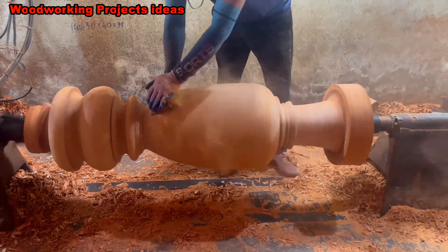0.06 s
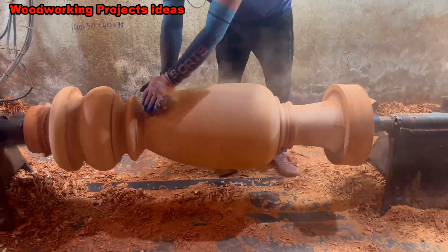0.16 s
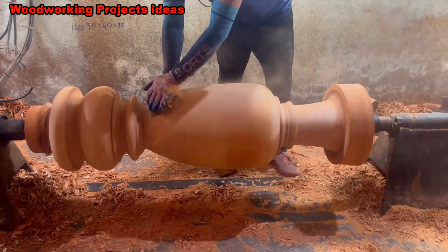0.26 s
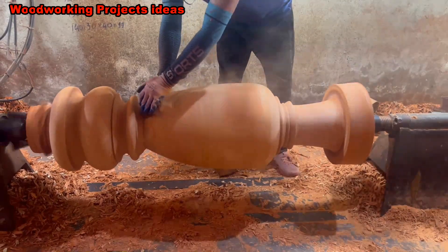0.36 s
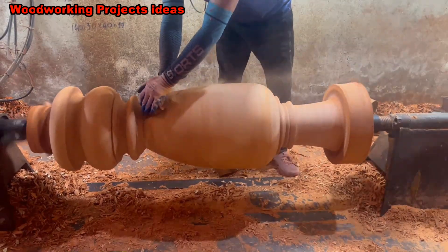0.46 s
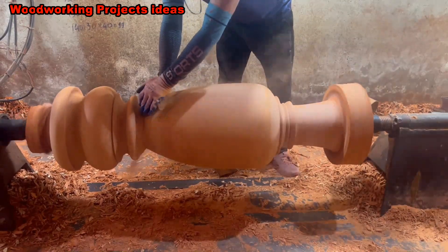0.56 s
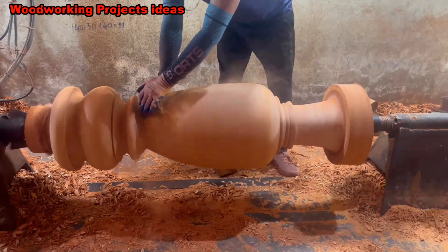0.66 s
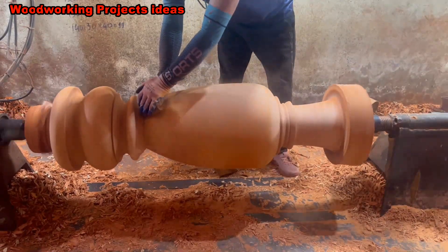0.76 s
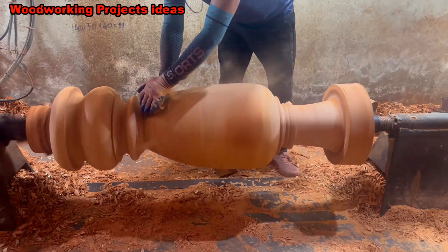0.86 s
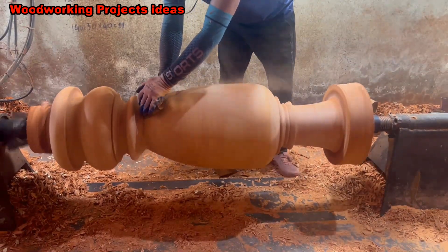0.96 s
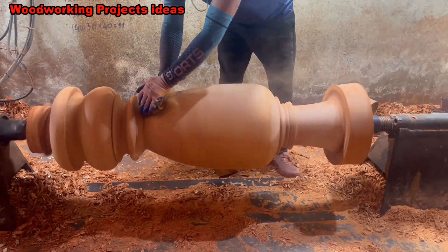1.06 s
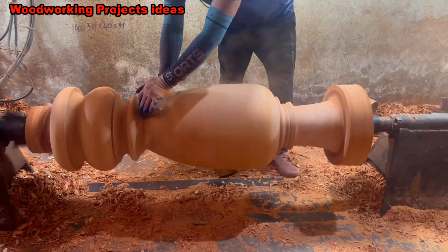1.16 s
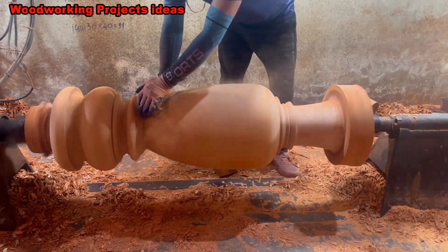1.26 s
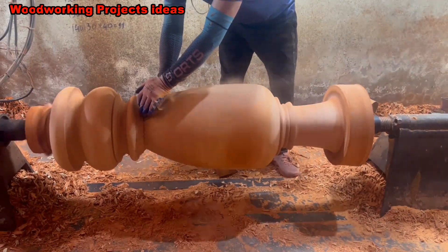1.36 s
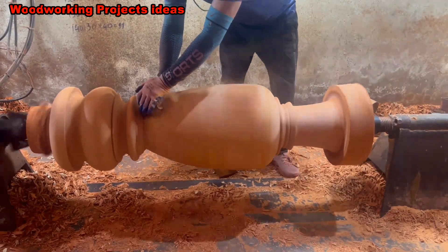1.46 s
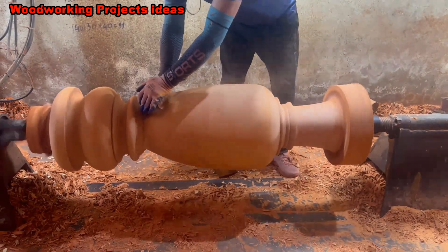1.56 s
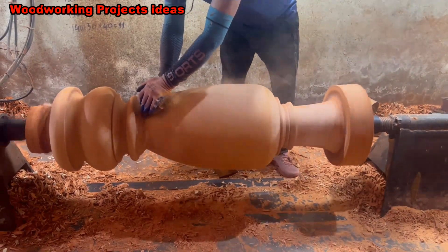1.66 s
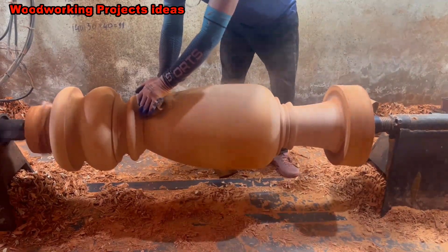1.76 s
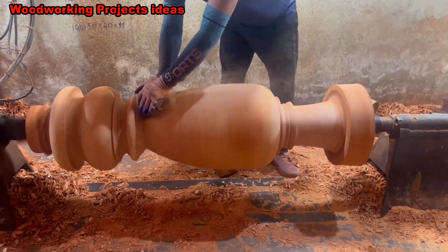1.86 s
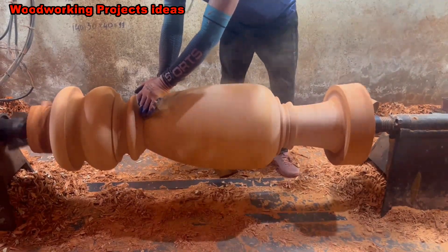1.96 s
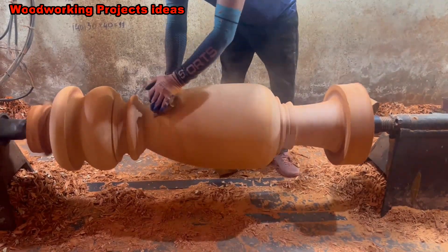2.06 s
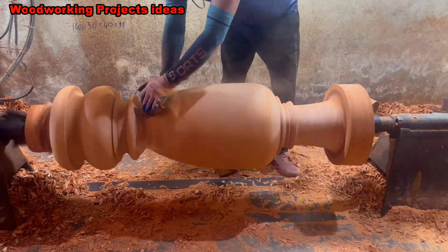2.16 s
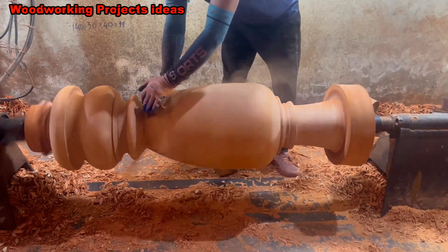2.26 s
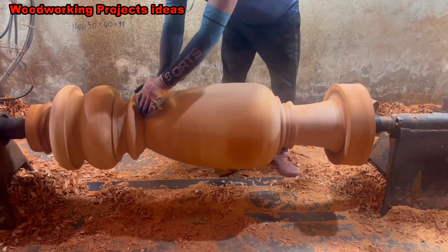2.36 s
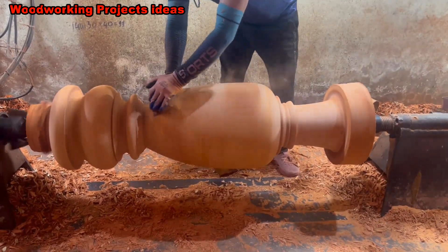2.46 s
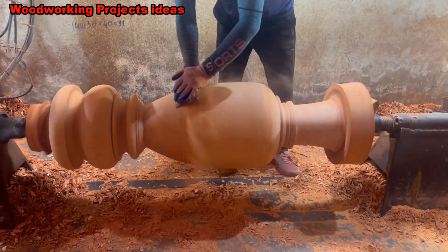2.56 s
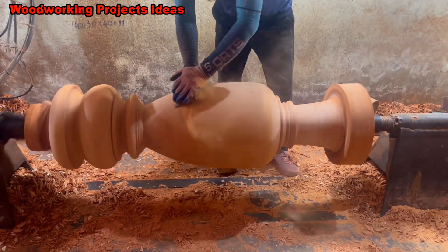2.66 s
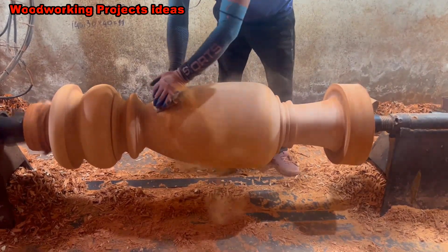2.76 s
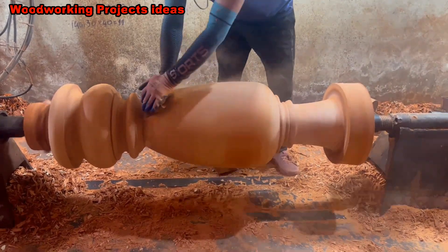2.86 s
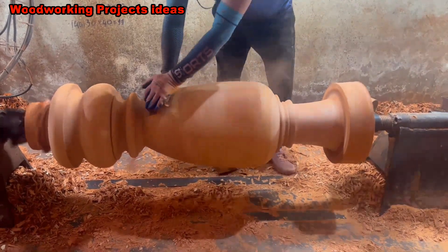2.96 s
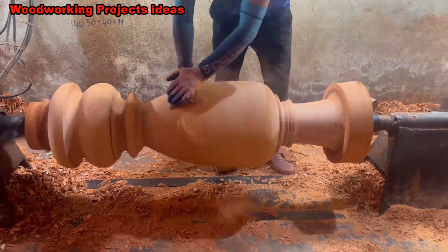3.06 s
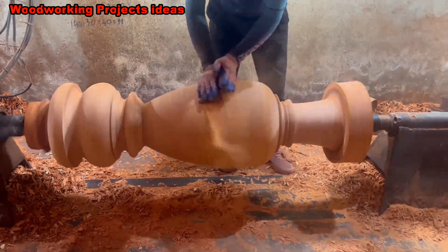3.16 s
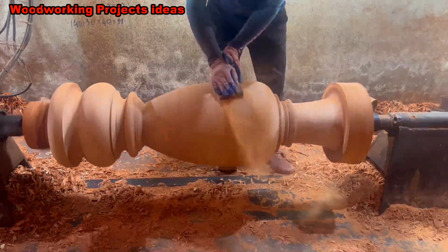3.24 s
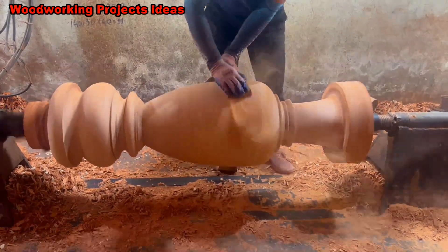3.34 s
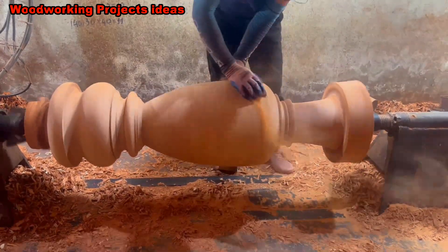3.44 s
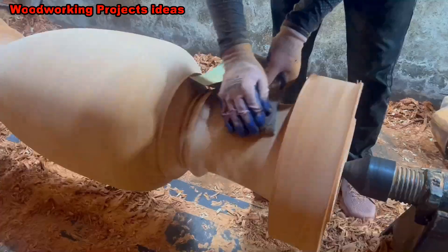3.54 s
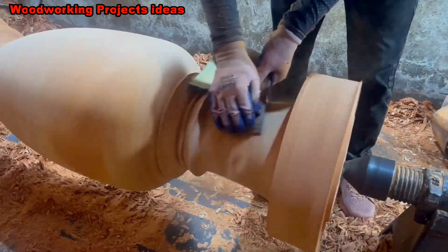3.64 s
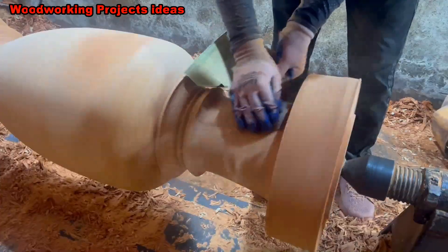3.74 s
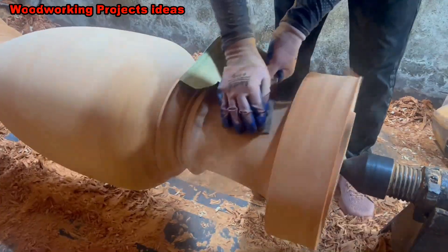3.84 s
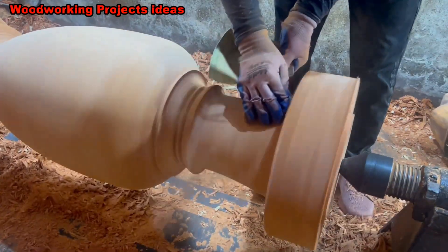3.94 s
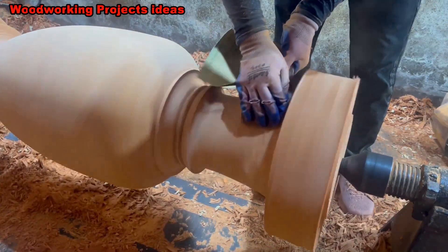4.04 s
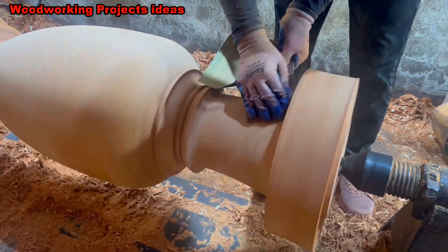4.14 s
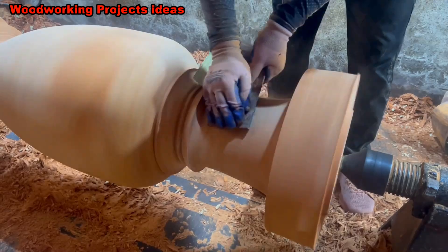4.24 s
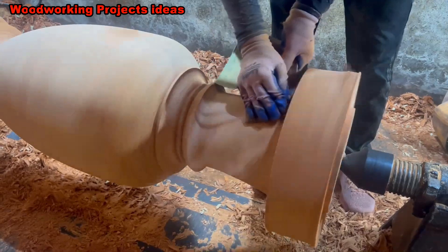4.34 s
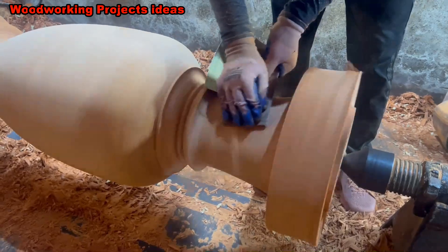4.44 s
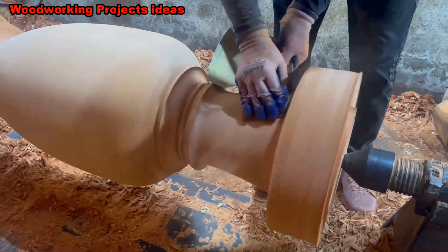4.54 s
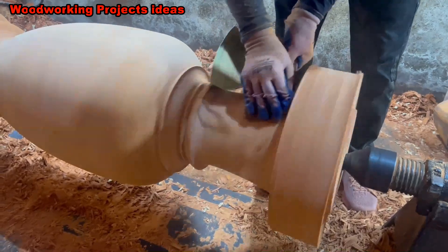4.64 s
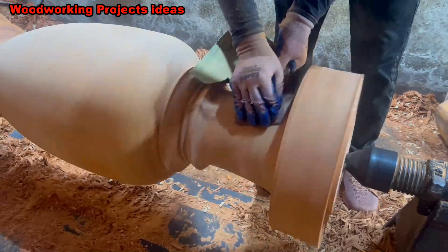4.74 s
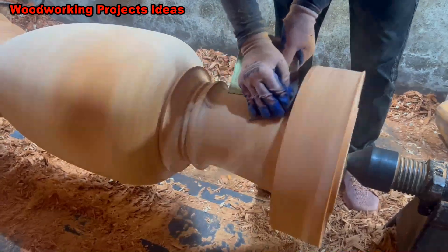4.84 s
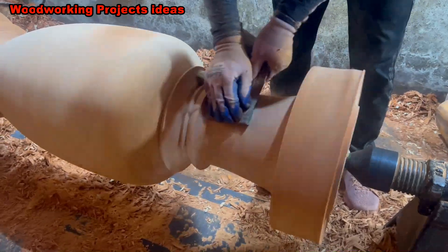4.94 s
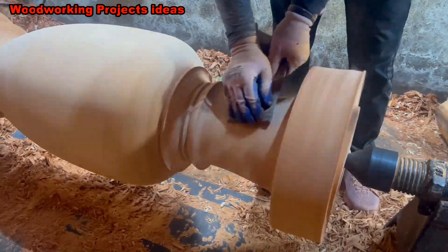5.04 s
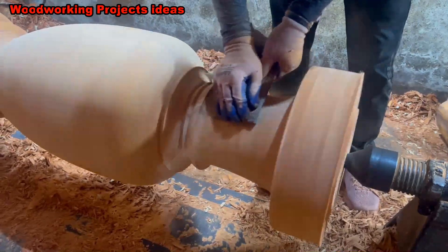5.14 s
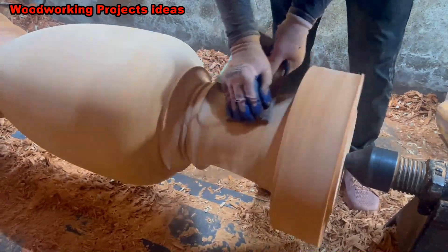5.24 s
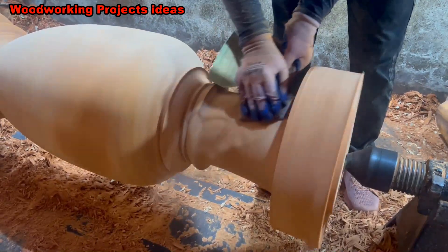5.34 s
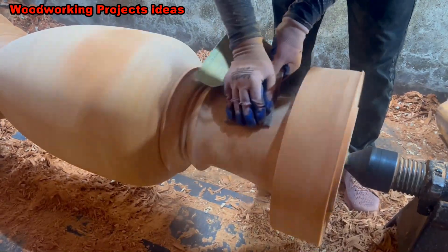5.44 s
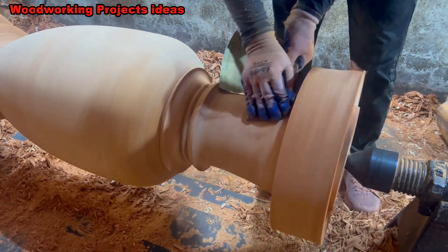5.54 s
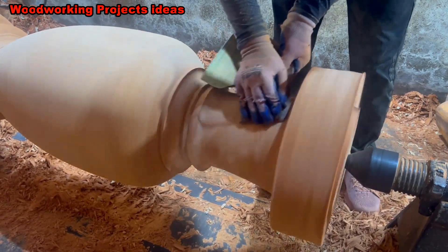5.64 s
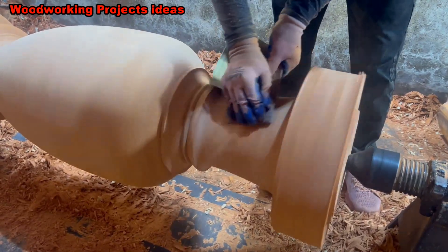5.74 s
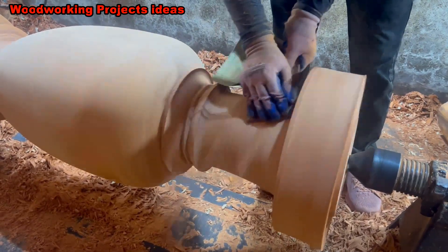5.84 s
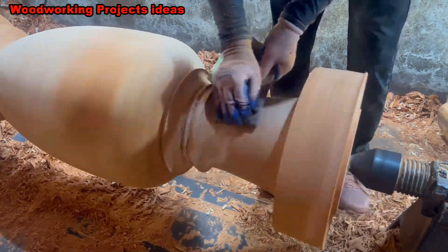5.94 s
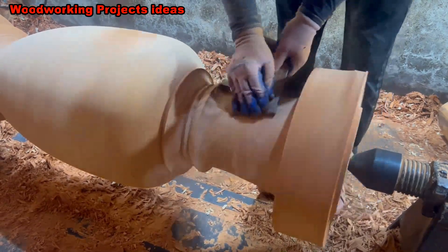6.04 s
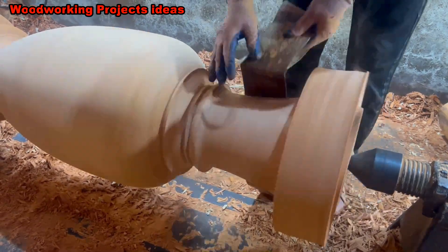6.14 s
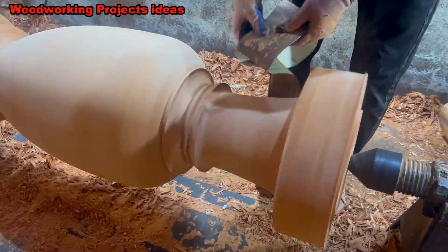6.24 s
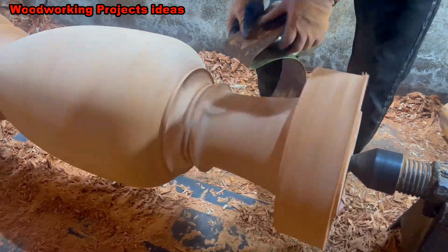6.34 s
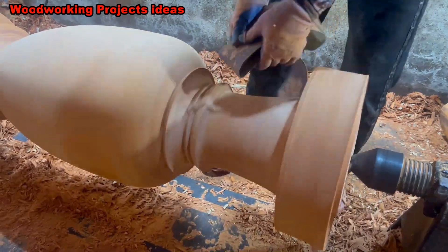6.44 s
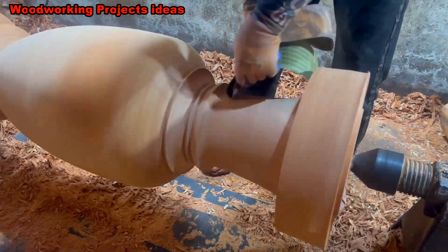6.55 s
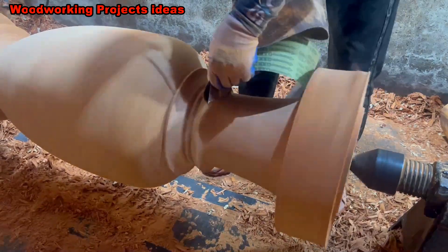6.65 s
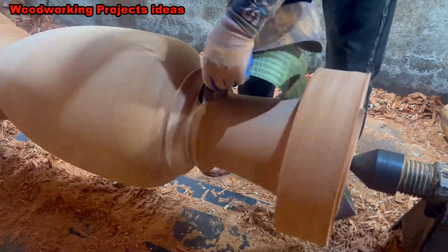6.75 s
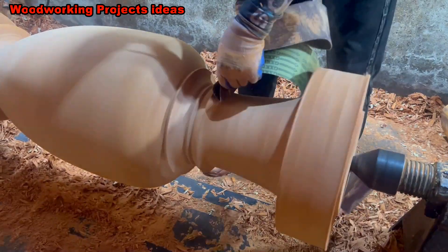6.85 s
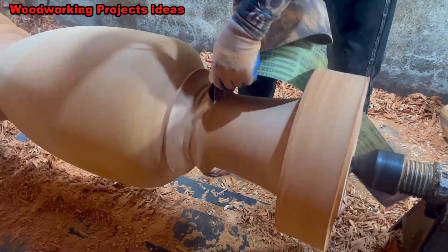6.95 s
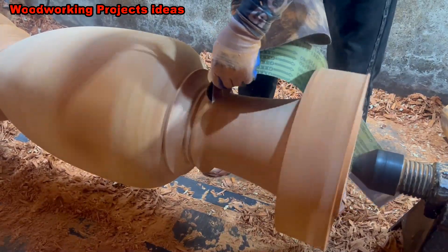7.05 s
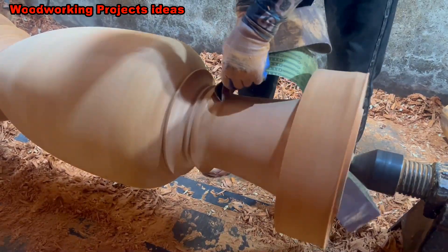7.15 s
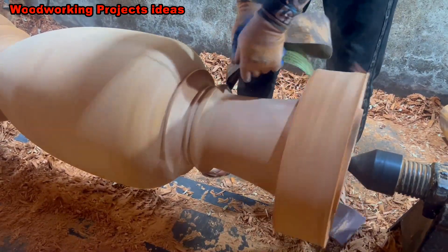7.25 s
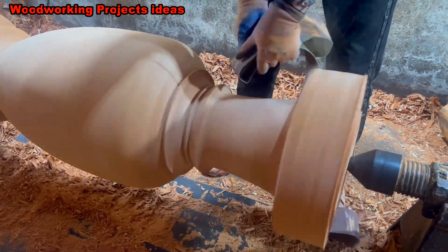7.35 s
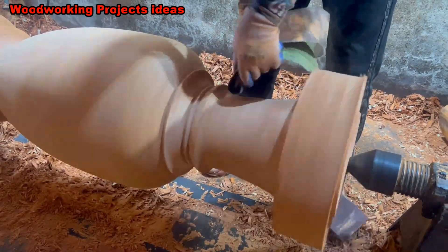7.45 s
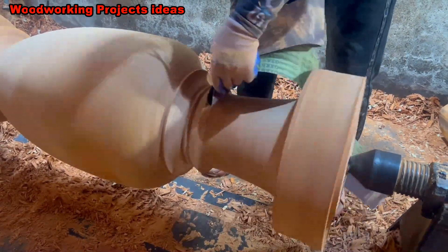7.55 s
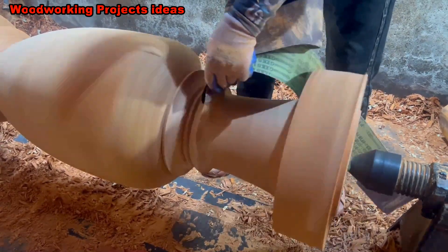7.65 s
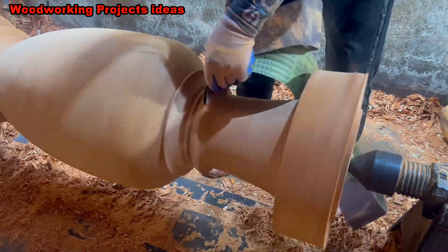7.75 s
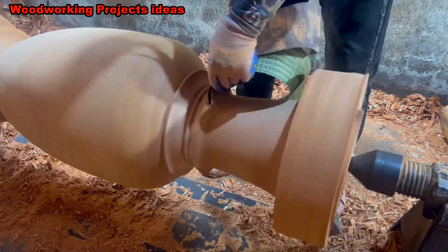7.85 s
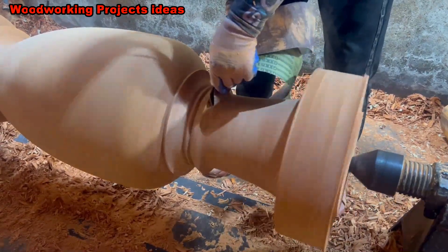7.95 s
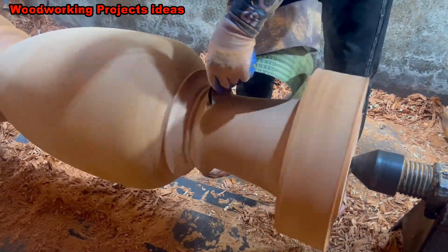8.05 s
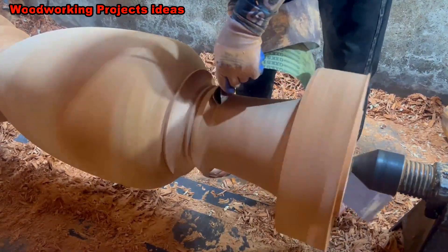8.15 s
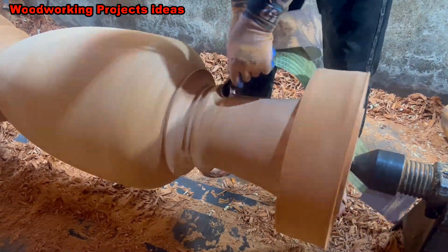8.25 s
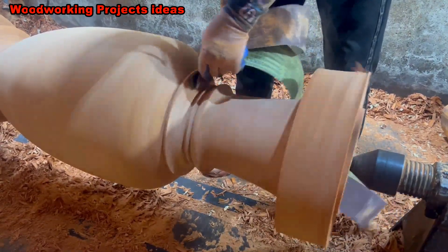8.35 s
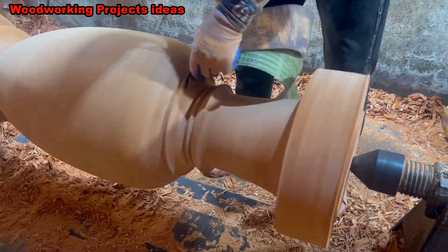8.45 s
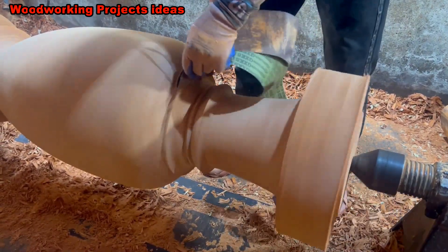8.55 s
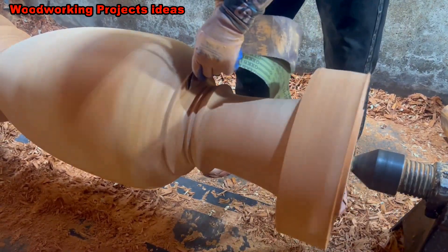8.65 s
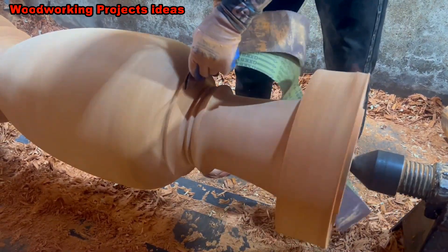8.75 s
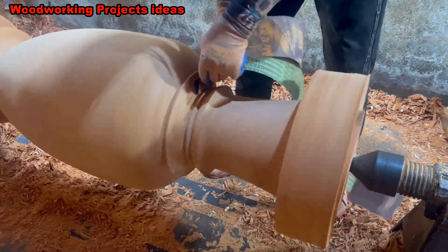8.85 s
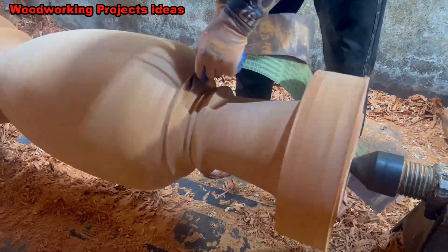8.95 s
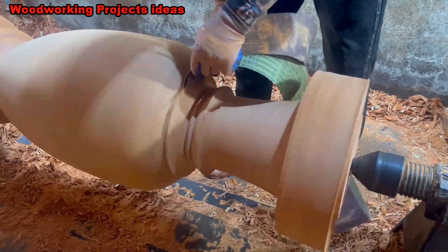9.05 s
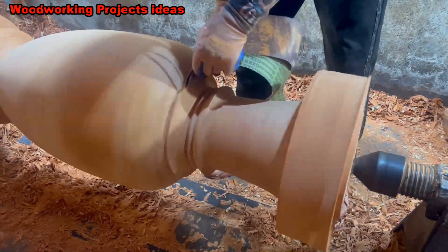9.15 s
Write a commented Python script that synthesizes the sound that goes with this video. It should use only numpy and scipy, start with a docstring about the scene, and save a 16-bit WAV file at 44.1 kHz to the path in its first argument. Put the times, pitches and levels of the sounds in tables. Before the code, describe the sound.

A wood lathe rumbles evenly in a workshop while sandpaper hisses and scrapes on the turning wood, throbbing slightly. After about four seconds the microphone is suddenly close: the rasp grows fuller and gusts of air thump softly against it. The paper lifts for half a second, leaving the machine's hollow whirr, then comes back in a few short, bright passes with small gaps between them.

```python
"""A workshop, where sandpaper is held against a big wooden column spinning on a lathe.
From a few steps away the microphone hears the belly sanded and swept; then, from close by, the neck,
a groove with the folded edge of the sheet, some dabs and the shoulder. Grit tears the fibres in a
rasping hiss that throbs with each turn, and the sheet scrapes and whistles. Under it the lathe rumbles;
close in, the draught of the wood buffets the microphone."""
import sys
import numpy as np
from scipy import signal
from scipy.fft import rfft, irfft, next_fast_len
from scipy.io import wavfile
from scipy.ndimage import map_coordinates

SR = 44100
rng = np.random.default_rng(int(sys.argv[2]) if len(sys.argv) > 2 else 0)


def dump(signal):
    """Clip the signal to [-1, 1] and save it as 16-bit WAV at the path in sys.argv[1]."""
    limited = np.clip(np.atleast_2d(signal).T, -1, 1)
    pcm = np.round(limited * 32767).astype(np.int16)
    wavfile.write(sys.argv[1], SR, pcm)


N = 405719
TIME = np.arange(N) / SR
TURN_HZ = 18.1
NEAR_START_S = 3.886   # the microphone is close to the wood from here on

# holds of the paper on belly, sweep, neck, groove, dabs and shoulder: (pressed home [s], lifted [s],
# rasp [dB], hiss [dB], sizzle [dB], extra first push [dB], spread of snaps [dB], lean to the left [dB])
HOLDS = [(0, 2.795, -33.5, -35, -38, 2.6, 1.3, 0.1), (2.805, 3.866, -33.5, -31.5, -39, -0.6, 1.5, 0),
         (3.901, 6.436, -30.5, -33, -37.5, 4, 1.4, 0), (6.944, 7.577, -36, -34, -34.5, 0.4, 2.0, -0.4),
         (7.866, 8.604, -36.5, -32, -34, -1, 2.5, 0), (8.732, 9.2, -33, -30, -35.5, -2, 3, 0.7)]
# colour of the friction in each hold: (frequency [Hz], relative level [dB])
BELLY_COLOUR = [(590, -46), (1000, -17), (1390, -16), (1690, -12), (2620, -8.5), (3180, -6), (4150, -2),
                (4490, -3.5), (6560, -1), (8540, 0.5), (11800, -22), (14100, -35), (15500, -45)]
SWEEP_COLOUR = [(650, -56), (1100, -34), (1370, -31), (1550, -13.5), (2020, -6), (2230, -9), (2730, -3.5),
                (2980, -4.5), (3520, 0), (4110, 1), (6050, -5.5), (8720, -5), (10300, -7), (12100, -23),
                (15500, -30)]
NECK_COLOUR = [(590, -30), (1000, -9.5), (1240, -5.5), (1920, 0.5), (2740, -2), (3610, 1.8), (4050, 0),
               (4340, -0.5), (5460, -1.5), (5920, -2), (6950, -5.5), (8840, -1), (9690, -3.5), (11000, -10),
               (11750, -18.5), (12500, -40), (15500, -36)]
GROOVE_COLOUR = [(710, -41), (1200, -9), (1420, -12), (1570, -8), (2510, -13.5), (2740, -9), (3350, -6.5),
                 (3850, -5), (4930, -4.5), (6800, -3.5), (7650, -2), (8510, -3.5), (9890, 1), (14500, -24),
                 (15500, -24)]
DABS_COLOUR = [(760, -33), (1300, -10), (1430, -18), (1620, -7), (1930, -6.5), (2350, -9.5), (2950, -8),
               (3590, -4.5), (4370, -6), (5330, -6), (6030, -5), (7420, -4.5), (8490, -6), (9820, 2),
               (15500, -24.5)]
SHOULDER_COLOUR = [(710, -23), (1200, -11.5), (1590, -13), (1820, -11), (2050, -12.5), (3140, -7),
                   (4670, -7), (7330, -4), (9080, -5.5), (9890, -2), (11900, -7), (14900, -32),
                   (15500, -43)]
# resonances of the sheet and the hollow under the hand: (pitch [Hz], width [Hz], level re friction [dB])
BELLY_MODES = [(3560, 130, -7), (4205, 70, -5), (8400, 500, -6)]
SWEEP_MODES = [(3750, 240, -18), (4490, 460, -3.5)]
NECK_MODES = [(1990, 170, -4), (2520, 380, -5), (3650, 560, -5.5), (4440, 520, -1), (5900, 200, -7)]
GROOVE_MODES = [(3880, 370, 0.5), (7740, 410, 1.5), (9800, 600, -14)]
DABS_MODES = [(5350, 470, 1.5), (7600, 630, 2), (9500, 440, -13)]
SHOULDER_MODES = [(5150, 400, -10), (7340, 450, -1)]
# the hand eases without lifting: (time [s], length at half depth [s], rasp loss [dB], hiss loss [dB])
EASES = [(0.02, 0.37, 2.5, 11.5), (1.55, 0.32, 3, -1), (2.98, 0.17, -0.7, 4.5), (3.65, 0.39, -2.5, 7),
         (3.665, 0.11, 5, 1.5), (3.85, 0.11, -0.5, -2), (6.4, 0.12, 2.5, 2.5), (6.968, 0.058, 3, 3.5),
         (7.9, 0.048, 3.5, 3), (8.032, 0.062, 0.5, 7.5), (8.155, 0.074, -0.5, 9.5), (8.375, 0.044, 3, 10),
         (8.78, 0.04, 0, 3), (9.175, 0.034, 2.5, 5)]
# echoes off the wood and the arm: (delay [ms], level re direct sound [dB])
REFLECTIONS = [(1.3, -28), (3.1, -16), (7.0, -12.5)]
# the running lathe from a few steps away and from close by: (frequency [Hz], relative level [dB])
LATHE_FAR_COLOUR = [(18, -42), (30, -13), (65, -9.5), (108, -2.5), (147, -1), (236, -1.5), (355, -1.5),
                    (412, -4.5), (439, -5), (501, -6), (662, -5.5), (779, -2.5), (1030, -8.5), (1400, -3.5),
                    (1500, -8), (1950, -29), (3300, -120)]
LATHE_NEAR_COLOUR = [(120, -38), (200, -10), (486, -9.5), (585, -6), (752, -3.5), (1090, -11), (1180, -17),
                     (1450, -13.5), (1550, -12.5), (1630, -19), (1710, -13), (2830, -21), (9460, -38.5),
                     (11000, -43.5), (14300, -83), (22000, -120)]
# resonances and hollows of the lathe: (frequency [Hz], width [Hz], lift [dB])
MOTOR_MODES = [(139, 17, 1.5), (534, 93, -0.5), (905, 150, 3.5)]
BED_MODES = [(300, 53, 2.5), (430, 79, -5.5), (597, 58, 3), (770, 41, 1.5), (2060, 300, 4),
             (8900, 2800, 10)]
# left-right balance by pitch in the far and near parts; the top treble is duller on the left:
# (frequency [Hz], left minus right before limiting [dB])
BALANCE_FAR = [(60, -12), (92, 2), (140, -3.5), (210, -2.5), (330, -2), (500, -6.5), (770, 0.5),
               (1060, 3.5), (1300, 0.5), (1790, -1), (2740, -2), (4190, 0.5), (6410, 5.5), (9810, -1.5),
               (15000, -10)]
BALANCE_NEAR = [(60, -3), (99, -4), (160, -23), (270, -3.5), (450, -4), (740, 1.5), (1220, 1.5),
                (2010, 2.0), (3330, 0.5), (5500, 1.5), (9080, -0.5), (15000, -8.5)]
# bites of the paper: (time [s], length at half height [s], pitch [Hz], nominal width [Hz], level [dB])
SCRAPES = [(0.1, 0.17, 3700, 800, -39), (0.42, .3, 4900, 1200, -37.5), (0.65, .06, 4600, 1500, -37),
           (2.245, 0.037, 4150, 450, -35), (2.45, 0.12, 4250, 1300, -33), (2.86, 0.07, 4200, 1500, -31.5),
           (2.96, 0.12, 3720, 700, -34), (2.98, 0.1, 4500, 500, -34.5), (3.46, 0.12, 3900, 1100, -32.5),
           (3.55, 0.04, 4000, 1100, -32.5), (3.99, 0.12, 3800, 2600, -32), (4.14, 0.06, 4000, 2200, -29.5),
           (4.151, 0.05, 2260, 700, -30.5), (4.489, 0.049, 4000, 1500, -30), (5.2, 0.044, 2162, 700, -32.5),
           (5.56, 0.07, 3660, 900, -31), (6.07, 0.22, 1960, 480, -34.5), (6.085, 0.05, 2600, 1800, -33),
           (7.02, 0.03, 7350, 700, -35), (7.03, 0.04, 5000, 2000, -36), (7.16, 0.04, 4000, 900, -34),
           (7.866, 0.008, 9000, 4000, -32), (7.955, 0.05, 9600, 900, -33), (7.98, .06, 7500, 900, -39),
           (8.11, 0.1, 5400, 350, -42), (8.25, .08, 7100, 1600, -36), (8.52, 0.14, 4700, 2000, -37),
           (8.655, 0.025, 6500, 5000, -42), (8.84, 0.06, 7300, 1000, -36), (8.93, 0.067, 4900, 1200, -38),
           (9.1, 0.06, 4900, 1200, -38)]
# passing notches: (time [s], length at half depth [s], frequency [Hz], half width [Hz], loss [dB])
NOTCHES = [(0.05, 0.14, 1120, 140, 12), (0.31, 0.08, 520, 80, 24), (0.5, 0.07, 480, 80, 24),
           (0.82, 0.26, 540, 75, 13), (1.28, 0.06, 490, 70, 17), (1.75, 0.08, 505, 70, 19),
           (2.04, 0.12, 560, 100, 26), (2.46, 0.11, 555, 85, 26), (2.77, 0.07, 505, 75, 20),
           (3.02, 0.07, 505, 75, 24), (3.25, 0.13, 490, 70, 20), (4.68, 0.14, 2750, 400, 4),
           (5.3, 0.08, 2600, 270, 11), (6.37, 0.1, 2000, 350, 3), (7.88, 0.05, 3300, 270, 11),
           (7.97, 0.06, 3900, 270, 6), (8.29, 0.1, 2780, 160, 22), (8.85, 0.04, 2750, 150, 12),
           (9.03, 0.06, 4480, 140, 15)]
# quick whistles of the sheet on the belly: (time [s], relative peak [dB])
WHISTLES = [(1.508, -31.5), (1.791, -27.5), (1.845, -30.5), (1.898, -28.5), (1.943, -30), (1.99, -30),
            (2.062, -28), (2.113, -28.5), (2.172, -28), (2.237, -30), (2.335, -32), (2.556, -29.5),
            (2.607, -27.5), (2.7, -31.5), (2.775, -30.5)]
# drone of the lathe close by: (time [s], level [dB])
DRONE_LEVEL = [(3.9, -42), (4.5, -44), (4.9, -45.5), (6.0, -48.5), (6.6, -47.5), (8.1, -47), (8.75, -44.5),
               (9.2, -46)]
# strength of the draught on the microphone: (time [s], relative level [dB])
DRAUGHT_LEVEL = [(3.9, -43), (4.9, -46), (5.35, -47.5), (5.7, -55), (6.8, -58.5), (7.0, -48), (7.6, -59.5),
                 (8.2, -53), (8.55, -47.5), (9.2, -45.5)]
# colour of the draught's buffeting and deep rumble: (frequency [Hz], relative level [dB])
BUFFET_COLOUR = [(50, -31), (100, -8), (145, 2), (220, 0.5), (340, 1), (450, -3.5), (800, -37)]
RUMBLE_COLOUR = [(15, -20), (30, 2), (60, 3), (90, 10), (130, 1.5), (220, -48)]
# gusts: (time [s], length at half height [s], buffeting rise [dB], rumble rise [dB])
GUSTS = [(4.02, 0.1, 5.5, 20), (4.85, 0.03, 7, 5), (5.105, 0.025, 12, 13.5), (5.2, 0.083, 2.5, 9),
         (5.41, 0.04, 12.5, 2), (5.83, 0.037, 6, 5), (6.09, 0.042, 11, 9), (6.42, 0.05, 17, 14),
         (6.54, 0.14, 8, 18), (7.33, 0.033, 11.5, 4), (7.775, 0.04, 16, 24), (8.0, 0.026, 13, 12),
         (8.49, 0.044, 9, 10)]
# single eddies on the microphone: (time [s], relative level [dB], pitch [Hz])
THUMPS = [(3.961, -16, 340), (3.972, -21, 132), (3.988, -23, 160), (4.014, -20.5, 153), (4.039, -21, 197),
          (4.068, -24, 132), (4.164, -27, 318), (5.089, -38, 339), (5.409, -39, 245), (6.42, -26.5, 336),
          (6.522, -36, 207), (7.779, -34, 253), (7.998, -29, 455)]
# moments when the low end suddenly drops away: (start [s], end [s], bass cutoff [Hz])
BASS_DROPS = [(5.714, 5.768, 260), (5.9, 5.981, 135), (6.17, 6.212, 230), (6.25, 6.33, 125),
              (7.22, 7.252, 110), (7.45, 7.56, 220), (8.076, 8.13, 250), (8.17, 8.354, 120)]
# throbs in the hollow whirr of the lathe: (time [s], pitch [Hz], relative peak [dB])
WHIRR_THROBS = [(6.5, 770, -38), (6.703, 613, -37), (6.868, 760, -34.5), (6.884, 780, -37),
                (7.335, 565, -35), (7.612, 753, -35.5), (7.64, 820, -38), (7.769, 753, -37),
                (7.805, 770, -35.5), (8.274, 597, -38), (8.385, 780, -36), (8.414, 796, -37),
                (8.531, 802, -36), (8.561, 764, -34), (8.591, 737, -37), (8.665, 780, -37),
                (8.696, 759, -33.5), (8.732, 748, -33.5)]


def from_db(db):
    """Decibels to gain."""
    return 10 ** (np.asarray(db) / 20)


def bins_of(t):
    """The FFT frequencies of a stretch of sound, in Hz."""
    return np.maximum(np.fft.rfftfreq(2 * next_fast_len(len(t) // 2 + 1), 1 / SR), 1)


def at_hz(points, bins):
    """Join rows of (frequency [Hz], value) on a log-frequency axis."""
    hz, value = np.transpose(points)
    return np.interp(np.log(bins), np.log(hz), value)


def filtered(sound, gain):
    """Apply a gain per frequency."""
    size = 2 * (len(gain) - 1)
    return irfft(rfft(sound, size) * gain, size)[..., :sound.shape[-1]]


def between(t, start, end):
    """One from start to end, with 10 ms equal-power ramps."""
    return np.sqrt(np.clip(.5 + np.minimum(t - start, end - t) / .01, 0, 1))


def humps(t, rows):
    """Smooth rises and falls from rows of (time [s], length at half height [s], height)."""
    return sum(height * np.cos(np.pi / 2 * np.clip((t - s) / length, -1, 1)) ** 2
               for s, length, height in rows)


def plateau(t, start, end, edge_s=0.058):
    """One from start to end, sloping to zero outside."""
    return np.clip(1 + np.minimum(t - start, end - t) / edge_s, 0, 1)


def drift(t, rate_hz):
    """Smooth random wavering with a spread of about one."""
    step, run_in = 40, 4000
    pole = np.exp(-2 * np.pi * rate_hz * step / SR)
    white = rng.standard_normal(len(t) // step + run_in + 2)
    slow = signal.lfilter([1], [1, -2 * pole, pole * pole], white)
    return np.interp(np.arange(len(t)) / step + run_in, np.arange(len(slow)), slow / slow.std())


def resonance(bins, hz, width):
    """Gain of one resonance, one at its peak."""
    return 1 / np.sqrt(1 + (2 * (bins - hz) / width) ** 2)


def band_rms(gain, bins, band):
    """Rms within a band of the mean of two unrelated white noises with this gain."""
    return np.sqrt(np.mean(gain ** 2 * (bins > band[0]) * (bins < band[1])) / 2)


def noise(colour, band_hz, modes=()):
    """Diffuse stereo noise with a colour and resonances; its mono mix has rms one within the band."""
    bins = bins_of(TIME)
    lift_db = sum(db * resonance(bins, hz, width) ** 2 for hz, width, db in modes)
    gain = from_db(at_hz(colour, bins) + lift_db)
    return filtered(rng.standard_normal((2, N)), gain / band_rms(gain, bins, band_hz))


def grit(t, spread_db):
    """Grains tear wood fibres at random: many tiny snaps, a few big ones, different on each side."""
    size = from_db(spread_db * np.minimum(rng.exponential(1, len(t)), 6))
    snaps = size * rng.standard_normal((2, len(t)))
    return snaps / snaps.std()


def sheet_ring(t, snaps, gain, slide):
    """A resonance of the sheet comes and goes, sliding by a share of its pitch as the fingers shift."""
    read_at = np.arange(len(t)) + np.cumsum(slide * drift(t, 7))
    ring = [map_coordinates(side, [read_at], order=3, mode="mirror") for side in filtered(snaps, gain)]
    return np.array(ring) * from_db(1.6 * drift(t, 16))


def reflected(sound, t, wander=0.0402):
    """Short echoes comb the hiss; their paths change as the hand moves."""
    out = sound.copy()
    for delay_ms, db in REFLECTIONS:
        for side in range(2):
            delay_s = delay_ms / 1000 * (1 + wander * drift(t, 1.585))
            out[side] += from_db(db) * np.interp(t - delay_s, t, sound[side])
    return out / np.sqrt(1 + sum(from_db(db) ** 2 for _, db in REFLECTIONS))


def throb(t, turn_db, half_turn_db):
    """The slightly oval wood presses once and twice a turn; in dB."""
    angle = 2 * np.pi * TURN_HZ * t + 0.66 * drift(t, 0.91)
    return turn_db * np.sin(angle) + half_turn_db * np.sin(2 * angle)


def pressure(t, pressed, lifted, push_db, attack_db_per_s=1198, release_db_per_s=433, settle_s=0.83):
    """The hand presses home, settles and lets go; the wood throbs under it and the sheet chatters."""
    contact_db = -attack_db_per_s * np.maximum(pressed - t, 0)
    contact_db -= release_db_per_s * np.maximum(t - lifted, 0)
    settling_db = push_db * np.exp(-np.maximum(t - pressed, 0) / settle_s)
    chatter_db = 0.9 * drift(t, 75)
    return from_db(contact_db + settling_db + chatter_db + throb(t, turn_db=-0.18, half_turn_db=0.12))


def touch(t, rasp_db, hiss_db, sizzle_db, bounce_hz=8.15):
    """The three band levels, in dB, as the hand eases and rides on the wood: a light touch is duller."""
    bounce_db = 0.5 * np.cos(2 * np.pi * bounce_hz * (t - 0.84))
    rasp_loss_db = humps(t, [(s, length, db) for s, length, db, _ in EASES])
    hiss_loss_db = humps(t, [(s, length, db) for s, length, _, db in EASES]) - bounce_db
    return rasp_db - rasp_loss_db, hiss_db - hiss_loss_db, sizzle_db - 0.46 * hiss_loss_db


def sanding(hold, colour, modes):
    """One hold: snaps of grit sound through the resonant sheet as rasp, hiss and fine sizzle."""
    pressed, lifted, rasp_db, hiss_db, sizzle_db, push_db, spread_db, lean_db = hold
    during = (TIME > pressed - .05) & (TIME < lifted + .12)
    t = TIME[during]
    bins = bins_of(t)
    snaps, power = grit(t, spread_db), 1
    for hz, width, db in modes:
        mode_gain = from_db(db) * resonance(bins, hz, width)
        snaps = snaps + sheet_ring(t, grit(t, spread_db), mode_gain, slide=0.14 * width / hz)
        power = power + mode_gain ** 2
    gain = from_db(at_hz(colour, bins))
    below_hiss = 1 / (1 + (bins / 5500) ** 10)
    below_sizzle = 1 / (1 + (bins / 9200) ** 20)
    shares = [below_hiss, below_sizzle - below_hiss, 1 - below_sizzle]
    bands_hz = [(1500, 5500), (5500, 9200), (9200, 11500)]   # rasp, hiss, sizzle
    friction = 0
    for share, band, db in zip(shares, bands_hz, touch(t, rasp_db, hiss_db, sizzle_db)):
        part = filtered(snaps, gain * share) / band_rms(gain * np.sqrt(power), bins, band)
        friction = friction + part * from_db(db + 0.45 * drift(t, 19))   # each wavers on its own
    sides = from_db([[lean_db / 2], [-lean_db / 2]])
    out = np.zeros((2, N))
    out[:, during] = reflected(friction, t) * pressure(t, pressed, lifted, push_db) * sides
    return out


def lathe_far(level_db=-47):
    """From a few steps away the lathe is a dull, even rumble with a few motor resonances."""
    rumble = noise(LATHE_FAR_COLOUR, (60, 1000), MOTOR_MODES)
    return rumble * from_db(level_db + 0.5 * drift(TIME, 15))


def balanced(sound, balance):
    """Each pitch leans a little to one side; the top treble is duller on the left."""
    lean_db = np.clip(at_hz(balance, bins_of(TIME)), -8, 7)
    sides = from_db([lean_db / 2, -lean_db / 2])
    sides = sides / np.sqrt(np.mean(sides ** 2, axis=0))
    return np.array([filtered(channel, gain) for channel, gain in zip(sound, sides)])


def scrapes():
    """The paper bites for a moment and one resonance sings out, pulsing as the wood turns."""
    out = np.zeros((2, N))
    for s, length, hz, width, db in SCRAPES:
        during = np.abs(TIME - s) < length
        t = TIME[during]
        bins = bins_of(t)
        gain = resonance(bins, hz, 1.5 * width) ** 2
        ring = filtered(grit(t, spread_db=1.0), gain) / band_rms(gain, bins, (0, SR))
        swell = humps(t, [(s, length, 1)])
        out[:, during] += ring * swell * from_db(db + throb(t, turn_db=2.5, half_turn_db=0))
    return out


def crumpling(hz, t, spread_db=1.5, spacing_hz=220, life_s=0.05):
    """Short-lived resonances of the crumpling sheet come and go all over the rasp; in dB."""
    centres = np.arange(1500, 9000, spacing_hz)
    knots = np.arange(0, t[-1] + life_s, life_s)
    draws = rng.standard_normal((len(centres), len(knots)))
    levels = np.array([np.interp(t, knots, row) for row in draws])
    return spread_db * np.exp(-(1.5 * (hz - centres) / spacing_hz) ** 2) @ levels


def shifting_colour(sound, hollow_hz=530, hand_echo_s=0.0008):
    """The sheet crumples, a hollow wanders, a comb slides, notches pass and the bass briefly drops."""
    hz, t, frames = signal.stft(sound, SR, nperseg=2048, noverlap=1536)
    hz = np.maximum(hz[:, None], 1)
    centre, depth, tilt = (np.interp(t, TIME, drift(TIME, rate_hz)) for rate_hz in (14, 14, 1.5))
    # in the far part, a hollow in the low middle
    hollow = np.exp(-((hz - hollow_hz - 38 * centre) / 72) ** 4) * between(t, 0.15, 3.52)
    db = crumpling(hz, t) - hollow * np.maximum(7 + 7 * depth, 0)
    # close by, an echo off the hand combs the hiss and slides as the hand tilts
    comb_db = 1.2 * np.cos(2 * np.pi * hz * hand_echo_s * (1 + 0.12 * tilt))
    db += comb_db * (hz > 1500) * (t > NEAR_START_S)
    for s, length, notch_hz, width, loss_db in NOTCHES:
        db -= humps(t, [(s, length, loss_db)]) * np.exp(-((hz - notch_hz) / width) ** 4)
    bass_cut_hz = np.max([cutoff * plateau(t, start, end) for start, end, cutoff in BASS_DROPS], axis=0)
    gain = from_db(db) / np.sqrt(1 + (bass_cut_hz / hz) ** 8)
    return signal.istft(frames * gain, SR, nperseg=2048, noverlap=1536)[1][:, :N]


def short_notes(rows, length_s=0.015, slide_hz_per_s=3900, trim_db=-1.5):
    """Rough resonances swell and die at once, a little off pitch and sliding, both sides near in step."""
    out = np.zeros((2, N))
    for (s, hz, db), (phase, lag, slide, detune) in zip(rows, rng.uniform(-0.95, 1, (len(rows), 4))):
        during = np.abs(TIME - s) < length_s
        t = TIME[during] - s
        cycles = hz * (1 + 0.012 * detune) * t + slide * slide_hz_per_s * t ** 2 / 2
        roughness = 0.09 * drift(t, 150)
        side_phase = np.array([[phase], [phase + lag / 8]])
        swell = humps(t, [(0.00032, length_s, from_db(db + trim_db))])
        out[:, during] += np.sin(2 * np.pi * (cycles + roughness + side_phase)) * swell
    return out


def whistles(pitch_hz=4205):
    """One resonance of the sheet whistles in quick pulses on the belly."""
    return short_notes([(s, pitch_hz, db) for s, db in WHISTLES])


def lathe_near(whirr_hz=780, whirr_width_hz=130):
    """Close by, the bearings set the bed and tailstock droning; a hollow whirr swells and sinks."""
    level_db = np.interp(TIME, *np.transpose(DRONE_LEVEL))
    swell = from_db(1.54 * drift(TIME, 14))
    drone = noise(LATHE_NEAR_COLOUR, (550, 900), BED_MODES)
    whirr = filtered(drone, np.exp(-((bins_of(TIME) - whirr_hz) / whirr_width_hz) ** 2))
    waver_db = throb(TIME, turn_db=1.0, half_turn_db=1.2) + 0.87 * drift(TIME, 23)
    return (drone + whirr * (swell - 1)) * from_db(level_db + waver_db)


def draught():
    """Air dragged round by the wood hits the microphone ports in lumps and gusts."""
    flow_db = np.interp(TIME, *np.transpose(DRAUGHT_LEVEL))
    # moments when the low end suddenly drops away
    bass_drop = np.max([plateau(TIME, start, end) for start, end, _ in BASS_DROPS], axis=0)
    buffet_db = flow_db - 1 - 8 * bass_drop + humps(TIME, [(s, span, db) for s, span, db, _ in GUSTS])
    rumble_db = flow_db - 16 - 20 * bass_drop + humps(TIME, [(s, span, db) for s, span, _, db in GUSTS])
    buffet = noise(BUFFET_COLOUR, (110, 420))
    rumble = noise(RUMBLE_COLOUR, (25, 100))
    rumble = .92 * rumble + .08 * rumble[::-1]   # a little of the deepest part reaches both sides
    lumps = drift(TIME, 23)
    return buffet * from_db(buffet_db + 2.4 * lumps) + rumble * from_db(rumble_db + 3.1 * lumps)


def thumps(decay_cycles=1.37, left_db=-1.0, right_db=-4.5):
    """A big eddy shoves the microphone's membrane, which swings back about once."""
    out, age = np.zeros((2, N)), TIME[:SR // 20]
    for s, db, hz in THUMPS:
        swing = np.sin(2 * np.pi * hz * age) * np.exp(-(hz * age / decay_cycles) ** 2)
        at = round(s * SR)
        out[:, at:at + len(age)] += from_db([[db + left_db], [db + right_db]]) * swing
    return out


def whirr_throbs():
    """Close by, the hollow whirr of the lathe throbs in short notes."""
    return short_notes(WHIRR_THROBS)


def scene():
    """The microphone a few steps away, a brief dip in level, then the microphone close to the wood."""
    colours = [BELLY_COLOUR, SWEEP_COLOUR, NECK_COLOUR, GROOVE_COLOUR, DABS_COLOUR, SHOULDER_COLOUR]
    modes = [BELLY_MODES, SWEEP_MODES, NECK_MODES, GROOVE_MODES, DABS_MODES, SHOULDER_MODES]
    belly, sweep, neck, groove, dabs, shoulder = map(sanding, HOLDS, colours, modes)
    far = balanced(belly + sweep + lathe_far(), BALANCE_FAR)
    near = balanced(neck + groove + dabs + shoulder + lathe_near(), BALANCE_NEAR) + draught() + thumps()
    workshop = far * between(TIME, 0, NEAR_START_S) + near * between(TIME, NEAR_START_S, np.inf)
    dip = from_db(-9 * np.exp(-((TIME - NEAR_START_S) / 0.012) ** 4))
    workshop = workshop * dip + scrapes()
    return whistles() + shifting_colour(workshop) + whirr_throbs()


def record(dry, cutoff_hz=15700):
    """The top of the treble is cut steeply."""
    return signal.sosfiltfilt(signal.ellip(10, .05, 70, cutoff_hz, fs=SR, output="sos"), dry)


dry = scene()
out = record(dry)
dump(out)
```